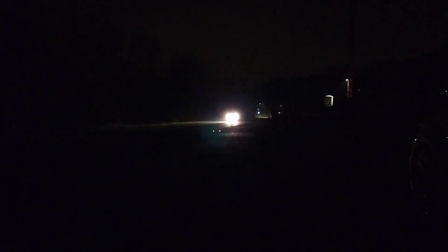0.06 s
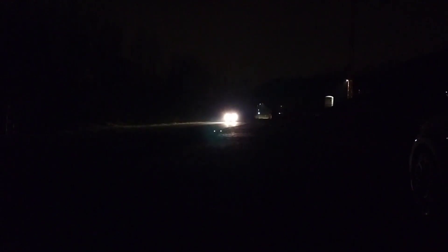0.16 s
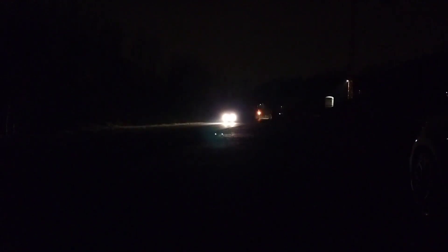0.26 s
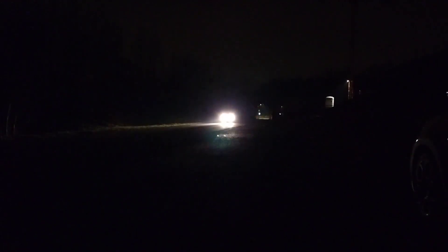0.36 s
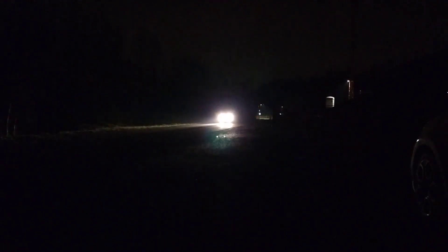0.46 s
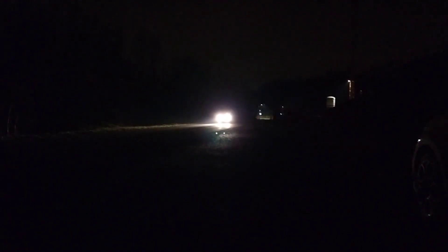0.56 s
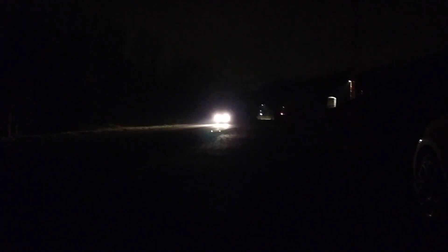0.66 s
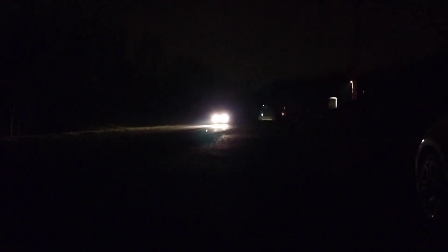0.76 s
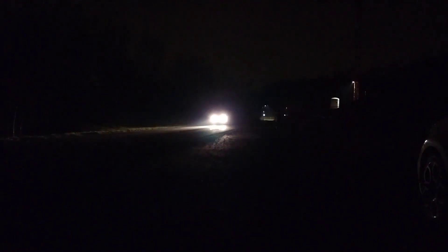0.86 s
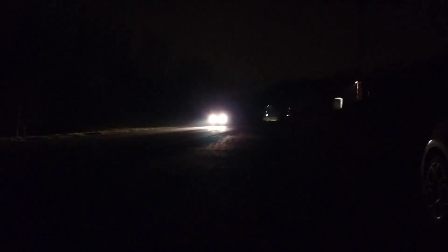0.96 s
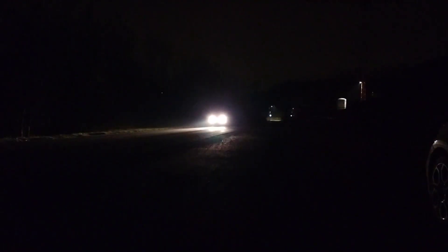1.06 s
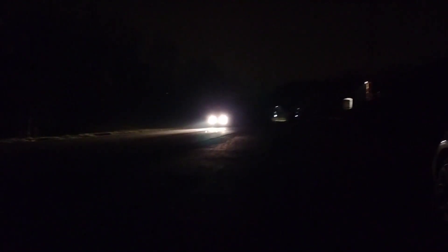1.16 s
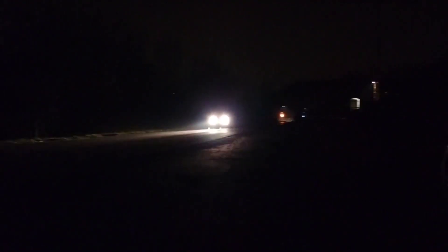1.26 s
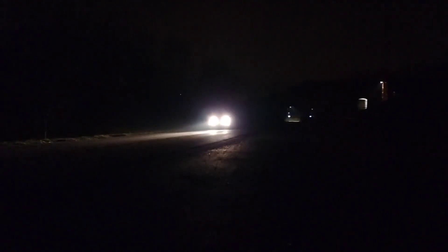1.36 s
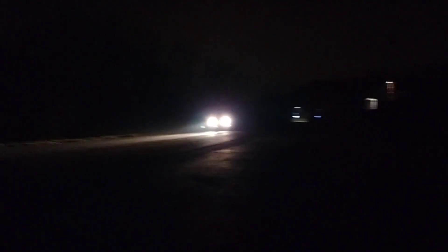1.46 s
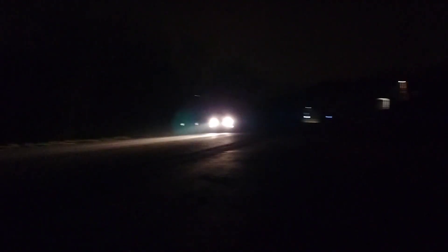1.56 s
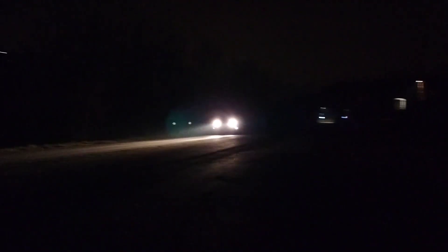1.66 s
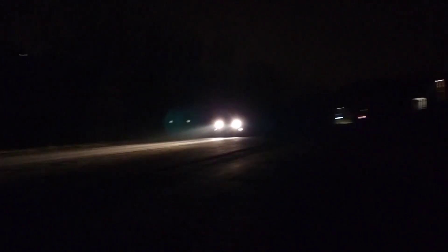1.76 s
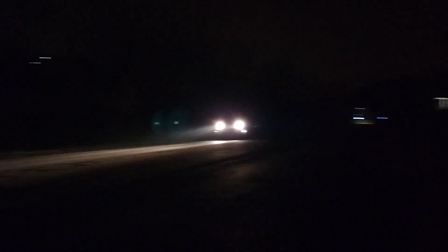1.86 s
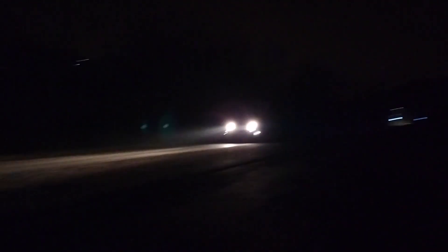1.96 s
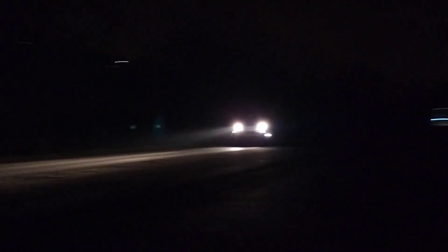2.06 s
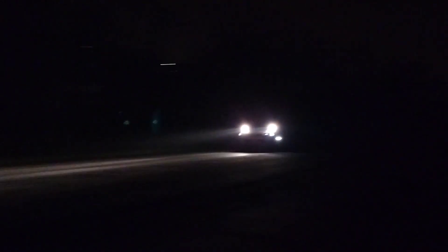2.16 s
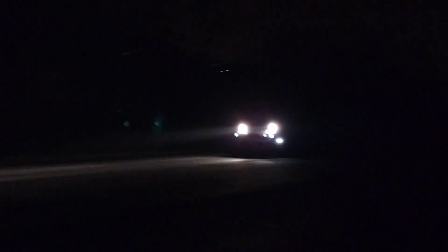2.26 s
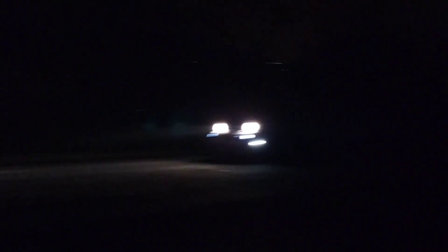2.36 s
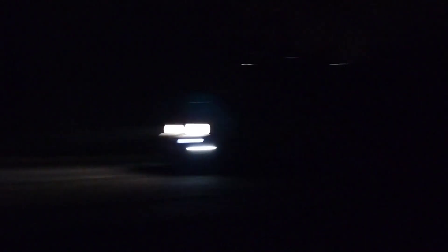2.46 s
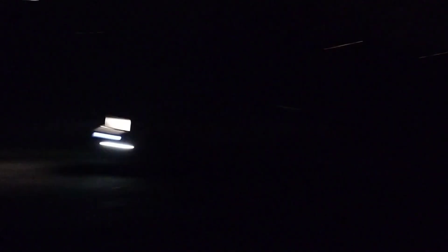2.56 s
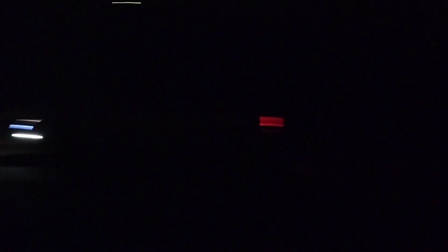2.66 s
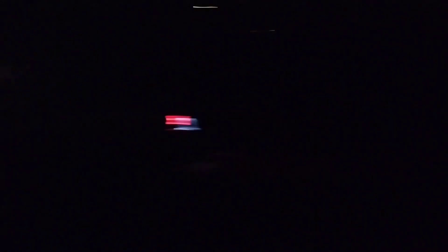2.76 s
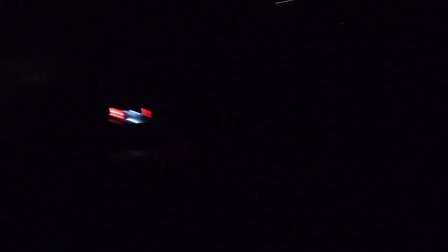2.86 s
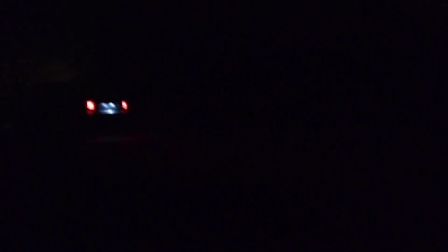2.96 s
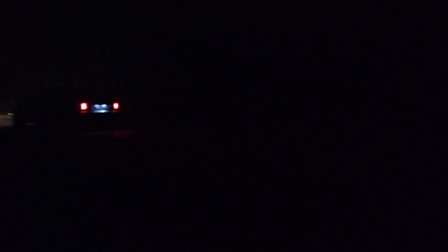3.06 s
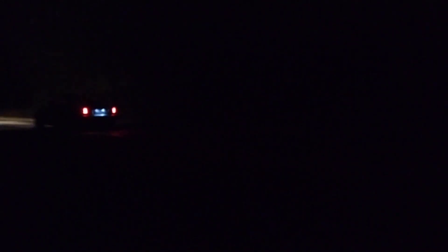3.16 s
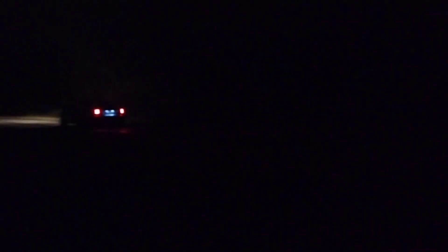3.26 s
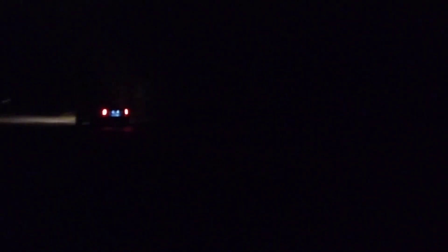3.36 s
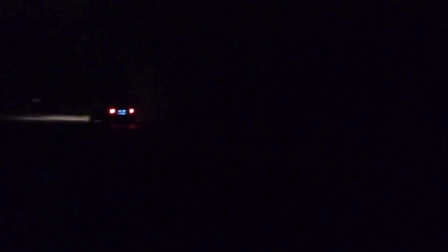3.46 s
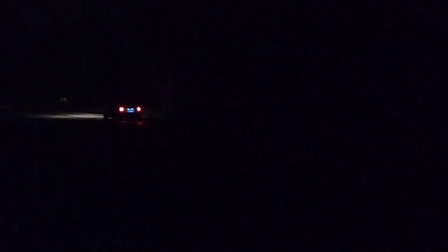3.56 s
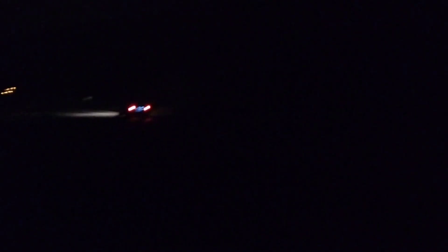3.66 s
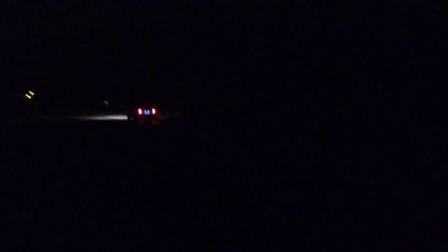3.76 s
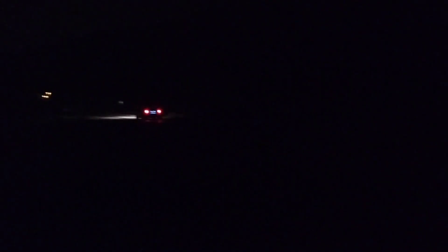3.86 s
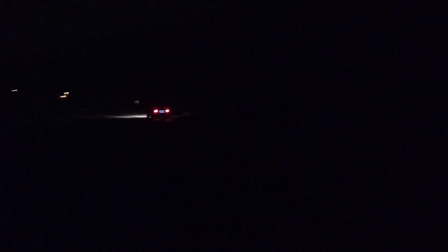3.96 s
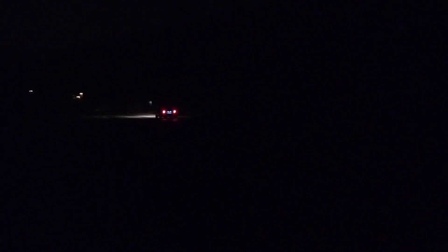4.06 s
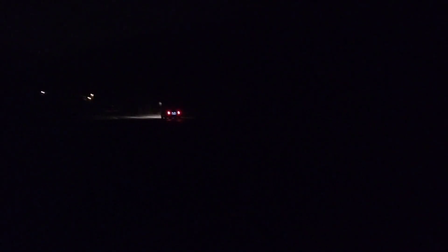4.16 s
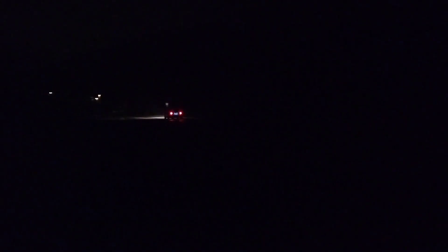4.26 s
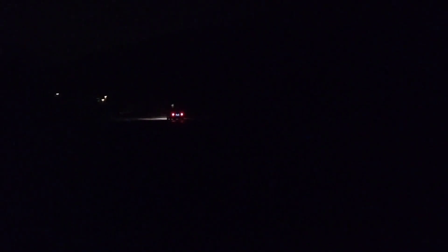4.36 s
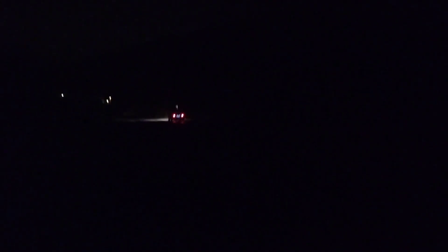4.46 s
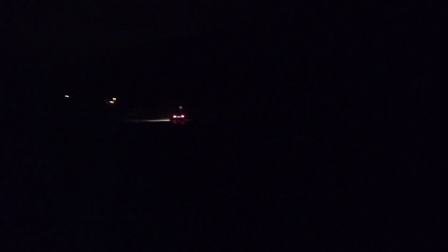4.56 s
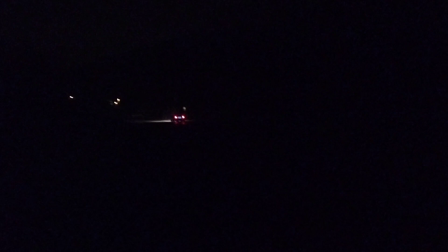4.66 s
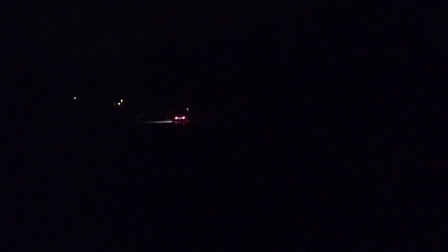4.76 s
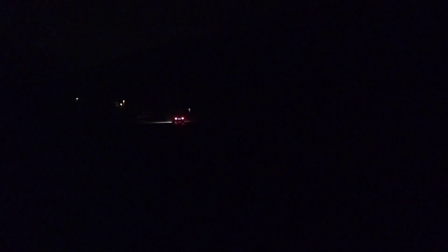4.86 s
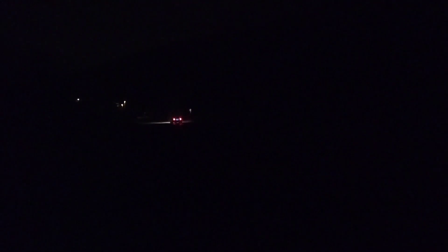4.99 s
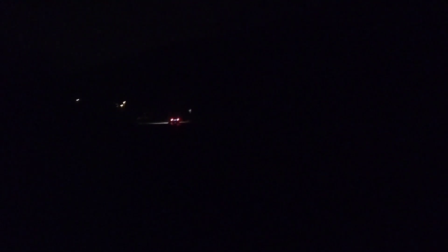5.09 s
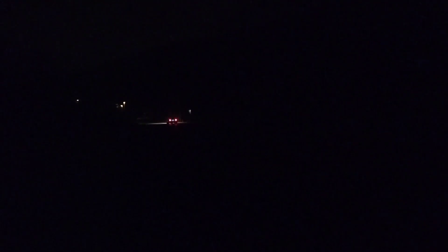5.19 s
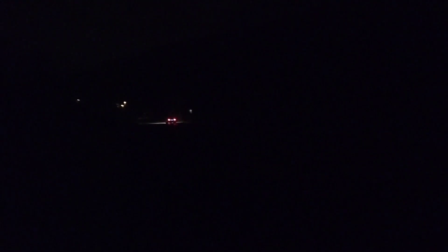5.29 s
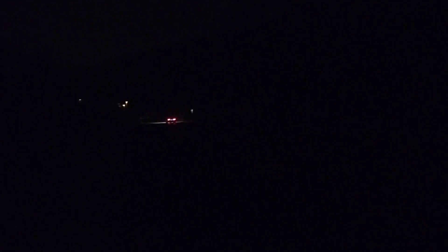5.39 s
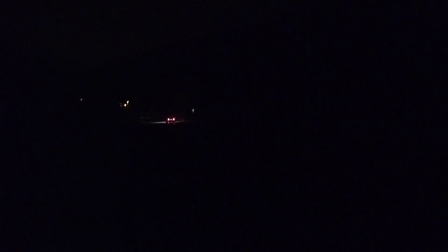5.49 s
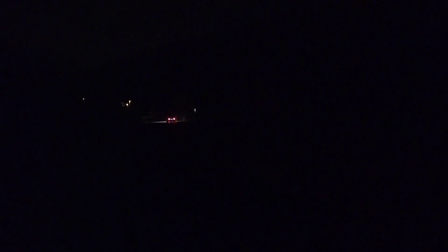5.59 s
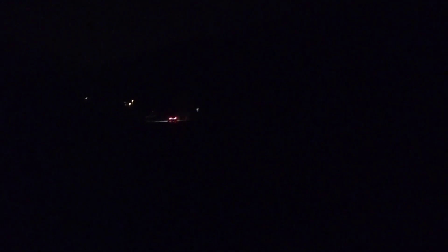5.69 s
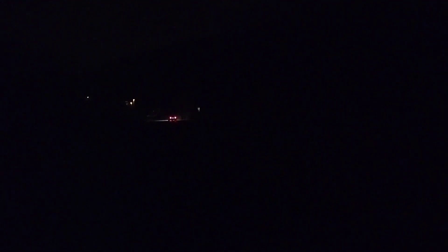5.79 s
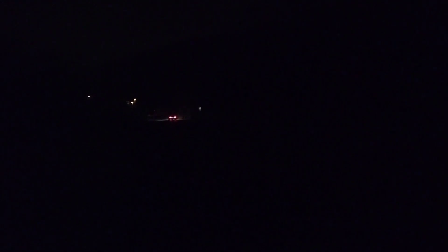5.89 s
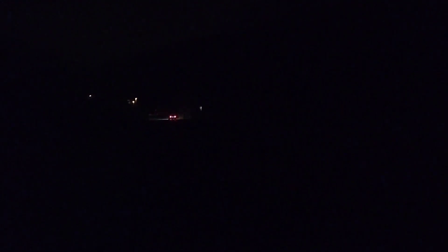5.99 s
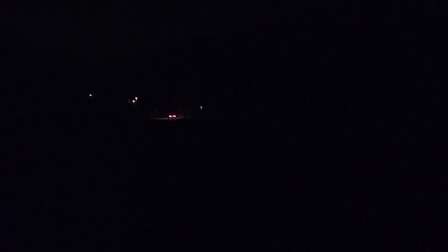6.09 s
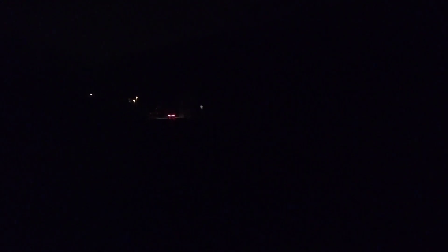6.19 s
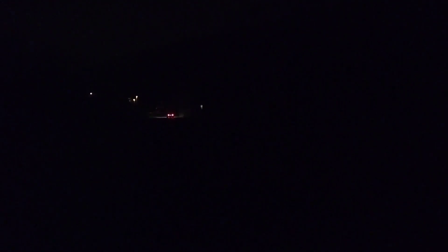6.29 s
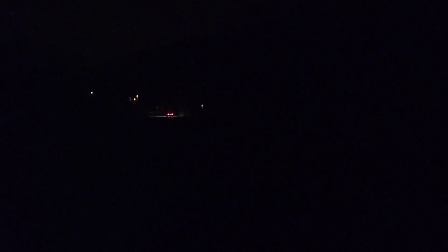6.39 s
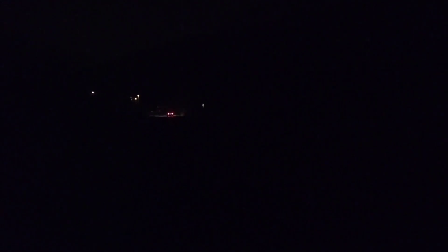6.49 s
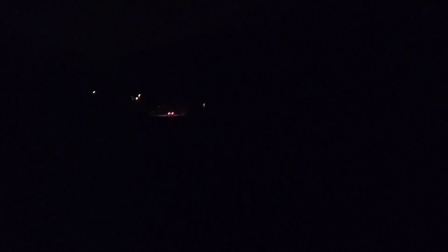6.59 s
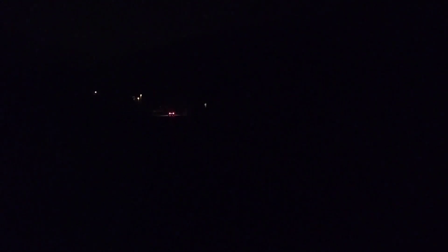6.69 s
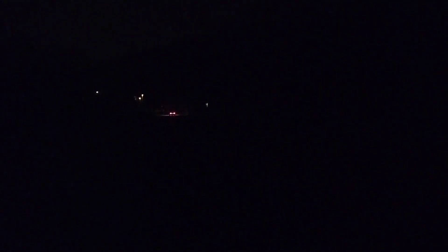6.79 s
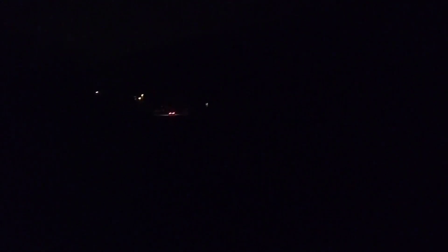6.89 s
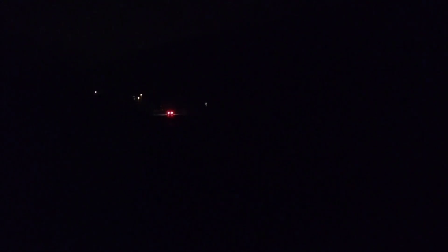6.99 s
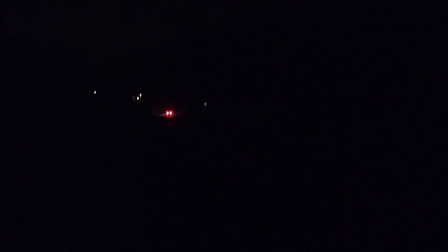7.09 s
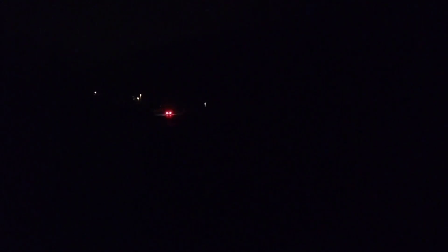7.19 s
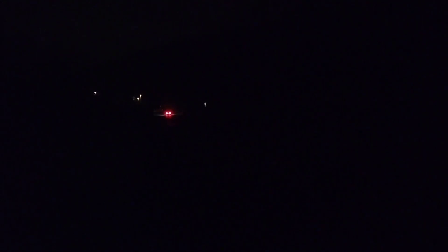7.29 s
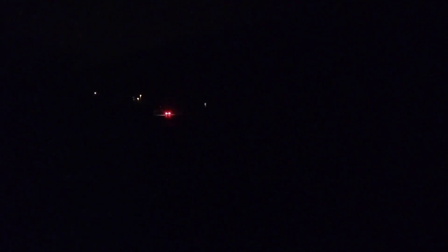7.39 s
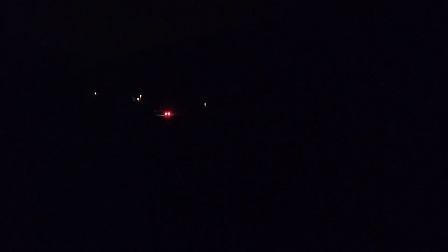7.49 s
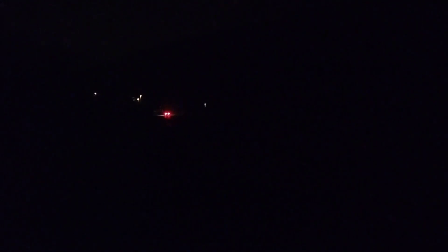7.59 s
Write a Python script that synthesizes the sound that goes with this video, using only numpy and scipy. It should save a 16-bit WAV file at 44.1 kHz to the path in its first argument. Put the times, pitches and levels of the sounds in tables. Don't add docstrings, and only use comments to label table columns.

```python
import sys
import numpy as np
from scipy import signal
from scipy.fft import rfft, irfft, next_fast_len
from scipy.io import wavfile
from scipy.ndimage import map_coordinates

SR = 44100
rng = np.random.default_rng(int(sys.argv[2]) if len(sys.argv) > 2 else 0)


def persist_wave(psi):
    counts = np.round(np.clip(psi, -1, 1) * 32767).astype(np.int16)
    wavfile.write(sys.argv[1], SR, np.atleast_2d(counts).T)


def gain_from_db(level_db):
    decades = np.asarray(level_db, float) / 20
    return 10 ** decades


N = 336924
SECONDS = np.arange(N) / SR
LANE_M = 8.16


def unit(x):
    return x / np.sqrt(np.mean(x ** 2) + 1e-20)


def curves(rows):
    s, *columns = np.transpose(rows)
    return [np.interp(SECONDS, s, column) for column in columns]


def along(points, x):
    at, value = np.transpose(points)
    return np.interp(np.log(x), np.log(at), value)


def by_view(values, turned):
    return np.interp(turned, np.arange(len(values)), values)


def wobble(rate):
    coarse = np.arange(0, N + 64, 64)
    knots = rng.standard_normal(int(N * rate / SR) + 4)
    return np.interp(np.arange(N), coarse, map_coordinates(knots, [coarse * rate / SR]))


def coloured(x, points):
    size = 2 ** 13
    f, db = np.transpose(points)
    log_hz = np.log(np.fft.rfftfreq(size, 1 / SR) + 1)
    gain = gain_from_db(np.interp(log_hz, np.log(f + 1), db, left=-120, right=-120))
    cepstrum = irfft(np.log(gain + 1e-5))
    cepstrum[1:size // 2] *= 2
    cepstrum[size // 2 + 1:] = 0
    response = irfft(np.exp(rfft(cepstrum)))
    return unit(signal.fftconvolve(x, response)[:N])


def rung(x, modes):
    m = next_fast_len(N + SR // 2)
    f = np.fft.rfftfreq(m, 1 / SR)
    gain = 0
    for k, (centre, width, db) in enumerate(modes):
        damping = 1j * f * width
        gain = gain + (-1) ** k * gain_from_db(db) * damping / (centre ** 2 - f ** 2 + damping)
    return irfft(rfft(x, m) * gain, m)[:N]


def soften(x, top_hz):
    return signal.sosfilt(signal.butter(3, top_hz, fs=SR, output="sos"), x)


def pulses(at, size):
    where = np.floor(at).astype(int)[:, None] + np.arange(-7, 9)
    offset = where - at[:, None]
    shape = np.sinc(offset) * np.cos(np.pi * offset / 16) ** 2 * size[:, None]
    return np.bincount(np.clip(where, 0, N).ravel(), shape.ravel(), N + 1)[:N]


def distance():
    since = SECONDS - 2.545
    travelled = 12.5 * since + 1.3 / 2 * np.clip(since, 0, None) ** 2
    return np.hypot(LANE_M, travelled)


# frequency in Hz, level in dB per Hz.
NIGHT_COLOUR = [(20, -26), (60, -13), (120, -11.5), (600, -20.5), (2000, -12), (4000, -23), (5000, -43.5),
                (8000, -61), (15700, -65)]


def night():
    return gain_from_db(-69.0) * coloured(rng.standard_normal(N), NIGHT_COLOUR)


# frequency in Hz, level in dB per Hz.
RUMBLE_COLOUR = [(20, -5), (40, -8.5), (70, -11.5), (110, -10), (200, -10), (320, -8), (500, -6),
                 (600, -3.5), (700, -19.5), (900, -13.5), (980, -57)]
RUMBLE_VIEW_DB = [-6, -13, -10, -2.5]


def rumble(blast_db, turned, throttle, drop_db):
    coasting_hush_db = 2 * (turned > 2.9) * (1 - throttle)
    level_db = by_view(RUMBLE_VIEW_DB, turned) + blast_db - drop_db - coasting_hush_db
    return gain_from_db(level_db + 1.8 * wobble(9.1)) * coloured(rng.standard_normal(N), RUMBLE_COLOUR)


SPREADING = [1.646, 2.05, 2.02]
ABSORPTION = [0.02, 0.25, 0.4]


def spread_db(band, metres):
    spreading = SPREADING[band] * 20 * np.log10(metres / LANE_M)
    return spreading + ABSORPTION[band] * (metres - LANE_M)


def layer(shots, turn, share, spectrum, gate):
    roar = np.gradient(rng.standard_normal(N)) * (1 + gate * np.cos(2 * np.pi * turn - .6))
    roar = roar * gain_from_db(0.53 * wobble(30) + 1.4 * wobble(16))
    share = np.clip(share, 0, 1)
    return np.sqrt(1 - share) * coloured(shots, spectrum) + np.sqrt(share) * coloured(roar, spectrum)


def blend(view, shots, turn, share, spectra, gate):
    mix = 0
    for k, spectrum in enumerate(spectra):
        weight = np.sqrt(np.clip(1 - np.abs(view - k), 0, 1))
        mix = mix + weight * layer(shots, turn, share, spectrum, gate)
    return mix


# frequency in Hz, level in dB per Hz.
AIR_COLOUR = [(7700, -62.5), (8200, 1), (9020, -5), (9630, -9.5), (10800, -14.5), (11600, -8.5),
              (11900, -7.5), (12300, -10), (12900, -18.5), (14800, -16), (15700, -14), (15900, -72)]
AIR_VIEW_DB = [-56.5, -55.5, -57.5, -63]


def air(sharp, turn, share, turned, metres, drop_db, crack_up):
    level_db = by_view(AIR_VIEW_DB, turned) - spread_db(2, metres) - drop_db
    level_db = level_db + 5 * np.exp(-.5 * ((SECONDS - 2.6) / 0.22) ** 2)
    level_db = level_db - 1.2 * np.clip(-85 - level_db, 0, None)
    return gain_from_db(level_db + 0.28 * crack_up) * layer(sharp, turn, share + 0.44, AIR_COLOUR, gate=0.13)


# frequency in Hz, level in dB per Hz.
SIZZLE_NEAR = [(4500, -64), (4800, -1.5), (5640, 3), (6350, -7), (7050, -6), (7370, -6.5), (7830, -18),
               (8300, -26), (8600, -69)]
SIZZLE_FAR = [(4500, -57.5), (4900, -13), (5400, -5.5), (5900, 0.5), (6600, -3), (7200, -5.5), (7700, -23),
              (8600, -71.5)]
SIZZLE_VIEW_DB = [-40, -36.5, -42.5, -45]


def sizzle(sharp, turn, share, turned, metres, drop_db, sizzle_up):
    level_db = by_view(SIZZLE_VIEW_DB, turned) - spread_db(1, metres) - drop_db
    level = np.hypot(gain_from_db(level_db + sizzle_up), gain_from_db(-88))
    far = np.clip(turned - 1, 0, 1)
    return level * blend(far, sharp, turn, share, [SIZZLE_NEAR, SIZZLE_FAR], gate=0.079)


# frequency in Hz, level in dB per Hz.
CRACK_NEAR = [(2200, -45.5), (2550, -9.5), (3050, -1.5), (3500, 3), (3830, 5.5), (4230, 1.5), (4680, -12),
              (5000, -25.5), (5400, -67.5)]
CRACK_FAR = [(1470, -41), (2500, -11.5), (2670, -0.5), (2890, -2.5), (3160, 2), (3640, -2), (4230, -15),
             (5000, -44), (6500, -72), (11000, -120)]
CRACK_VIEW_DB = [-33, -29.5, -29.5, -25.5]


def crack(sharp, turn, share, view, turned, metres, drop_db, crack_up):
    level_db = by_view(CRACK_VIEW_DB, turned) - spread_db(0, metres) - drop_db
    far = np.clip(view / 2 - .5, 0, 1)
    return gain_from_db(level_db + crack_up) * blend(far, sharp, turn, share, [CRACK_NEAR, CRACK_FAR], gate=0.1)


# centre in seconds, crack in dB, sizzle in dB, width in seconds.
VOLLEY_BURSTS = [
    (2.88, 4.5, 4, .025),
    (2.959, 3.5, 9.5, 0.023),
    (3.054, 6, 6, 0.013),
    (3.185, 8.5, 7.5, 0.025),
    (3.29, 6, 1, .016),
    (3.36, 7, 3, 0.02),
    (3.43, 2.5, 4, 0.019),
    (4.26, 6, 4.5, 0.047),
    (7.21, 7.5, 4, 0.065),
]


def volleys():
    s, *db, width = np.transpose(VOLLEY_BURSTS)
    return np.array(db) @ np.exp(-.5 * ((SECONDS - s[:, None]) / width[:, None]) ** 2)


# frequency in Hz, level in dB per Hz.
NOSE_RASP = [(440, -28), (750, 4), (810, -15.5), (837, -8.5), (1040, 4), (1280, -5.5), (1420, -1),
             (1570, -3), (2510, -15), (2800, -20.5), (3640, -35), (6160, -120)]
TAIL_RASP = [(500, -49.5), (700, -20.5), (850, 1), (950, 0.5), (1100, 0), (1300, -7), (1550, -9.5),
             (1930, -21.5), (2200, -20), (2500, -29), (2800, -59.5)]
NEW_GEAR_RASP = [(450, -61.5), (640, -10), (780, -7), (950, 0), (1150, -2.5), (1350, -12), (1600, -9.5),
                 (1850, -17.5), (2150, -15), (2450, -25.5), (2800, -63)]
FAR_RASP = [(450, -60.5), (660, -12.5), (850, -10), (1000, 1.5), (1180, 1.5), (1320, -5.5), (1490, -0.5),
            (1840, -14), (2150, -15), (2400, -35.5), (2800, -57)]


def rasp(steady, turn, share, view, turned, blast_db, drop_db):
    steady = np.where(view < 1.5, steady, soften(steady, 1500))
    swell_db = 1.8 * np.clip(turned - 2, 0, 1) * wobble(9)
    spectra = [NOSE_RASP, TAIL_RASP, NEW_GEAR_RASP, FAR_RASP]
    return gain_from_db(blast_db - drop_db + swell_db) * blend(view, steady, turn, share, spectra, gate=0.092)


# delay in firings, size in dB.
CYLINDER_SPREAD = [(.033, .5), (-.015, -.6), (-.003, .4), (-.015, -.3)]


def firings(turn, uneven, lag, scatter_db):
    n = np.arange(1, int(turn[-1]))
    late, size_db = np.transpose(CYLINDER_SPREAD)[:, n % len(CYLINDER_SPREAD)]
    chance = rng.standard_normal((len(n), 2))
    depth = np.interp(n, turn, uneven)
    at = np.interp(n + lag + depth * late + .003 * chance[:, 0], turn, np.arange(N))
    return pulses(at, gain_from_db(size_db + scatter_db * chance[:, 1]))


# frequency in Hz, level over the drone in dB.
NOSE_RESPONSE = [(170, -0.5), (260, -12.5), (340, -10), (510, -10.5), (680, -5.5), (860, -7.5)]
TAIL_RESPONSE = [(157, 0), (245, -3.5), (315, 2.5), (365, -1), (485, 8), (560, 7), (620, -2.5), (790, -6.5)]
CLOSED_ORDERS_DB = [2, -14, -19, -23.5, -38]
CREEP_ORDERS_DB = [-3, 13, 0.5, -17, 14]
CLOSE_ORDERS_DB = [-2, -6, -9, 6.5, 0.5]
# metres at which each clears the roadside, and the loss in dB before that.
CLEARING_M = [60, 60, 13.9, 20.2, 14.5]
ROADSIDE_LOSS_DB = [0, 0, 6.5, 14, 21]
# loss behind the bonnet in dB, and loss far away in dB per metre.
BONNET_LOSS_DB = [0, 1.5, 6, 12.5, 7]
FAR_LOSS_DB_PER_M = [0.042, 0, 0.0063, 0.068, 0.21]


def orders(hz, drone_db, throttle, turned, metres):
    tail = np.clip(turned, 0, 1) ** 4.2
    creeping = SECONDS < 0.16
    away = metres - LANE_M
    levels = []
    for k, closed_db in enumerate(CLOSED_ORDERS_DB):
        order_hz = (k + 1) * hz
        nose_db = along(NOSE_RESPONSE, order_hz) - BONNET_LOSS_DB[k] * np.exp(-away / 4.9)
        nose_db = nose_db - ROADSIDE_LOSS_DB[k] / (1 + np.exp(CLEARING_M[k] - metres))
        tail_db = along(TAIL_RESPONSE, order_hz) + CLOSE_ORDERS_DB[k] * np.exp(-away / 3)
        tail_db = tail_db - FAR_LOSS_DB_PER_M[k] * np.clip(away - 30, 0, None)
        open_db = np.where(creeping, CREEP_ORDERS_DB[k], tail * tail_db + (1 - tail) * nose_db)
        levels.append(drone_db + (1 - throttle) * closed_db + throttle * open_db)
    return levels


# time in seconds, beats so far, echo share 0-1.
WALL_ECHO = [(.44, 0, 0), (.729, 2, .28), (1.015, 4, .4), (1.21, 6, .25), (1.38, 8, .47), (1.54, 10, .45),
             (1.67, 12, .3), (1.8, 14, .3), (1.94, 16, 0)]


def drone(turn, hz, uneven, orders_db, flip):
    late = np.transpose(CYLINDER_SPREAD)[0]
    slip = np.interp(turn % len(late), np.arange(len(late) + 1), np.append(late, late[0]))
    phase = 2 * np.pi * (turn - .11 - 1.25 * uneven * slip + .003 * wobble(60))
    beats, echo = curves(WALL_ECHO)
    echo_phase = phase - 2 * np.pi * beats
    tone = 0
    for k, db in enumerate(orders_db, 1):
        lag = np.arctan2(k * hz * 130, 540 ** 2 - (k * hz) ** 2) - 1.2 + flip
        wave = np.cos(k * phase - lag) + echo / np.sqrt(k) * np.cos(k * echo_phase - lag)
        tone = tone + gain_from_db(db + 0.46 * wobble(25)) * np.sqrt(2) * wave
    return soften(tone, 3000)


# time in seconds, level in dB.
OVERRUN = [
    (6.98, -101),
    (7.05, -58),
    (7.22, -54),
    (7.27, -43.5),
    (7.64, -44),
]
# frequency in Hz, width in Hz, level in dB.
SILENCER_MODES = [(317, 13, 1), (483, 270, -16.5)]


def overrun(turn):
    second = np.interp(np.arange(1, turn[-1], 2), turn, np.arange(N))
    soft = pulses(second, gain_from_db(1.1 * rng.standard_normal(len(second))))
    soft = soften(soften(soft, 620), 620)
    return gain_from_db(curves(OVERRUN)[0]) * unit(rung(soft, SILENCER_MODES))


# time in seconds, peak in dB.
BACKFIRE_BANGS = [
    (4.0674, -6.5),
    (4.0737, -2.5),
]
# time in seconds, peak in dB.
BURBLE_POPS = [(7.03, -39), (7.05, -42), (7.066, -38), (7.081, -37), (7.09, -36), (7.107, -32),
               (7.129, -30.5), (7.143, -38), (7.16, -36), (7.179, -32), (7.19, -44), (7.204, -33.5)]
# frequency in Hz, width in Hz, level in dB.
PIPE_MODES = [(500, 33, 4), (1060, 210, -1), (146, 250, -1.5)]
GURGLE_MODES = [(301.6, 33.6, 5.5), (252, 54, -20), (464, 68, -21)]


def pops(events, modes, extra_db, top_hz):
    s, db = np.transpose(events)
    return rung(soften(pulses(s * SR, gain_from_db(db + extra_db)), top_hz), modes)


def bangs():
    backfire = pops(BACKFIRE_BANGS, PIPE_MODES, extra_db=31.0, top_hz=2204)
    burble = pops(BURBLE_POPS, GURGLE_MODES, extra_db=44.5, top_hz=450)
    snap = pulses(np.array([BACKFIRE_BANGS[-1][0] * SR]), np.array([gain_from_db(-40)]))
    return backfire + burble + snap


VIEW_GRAIN = [(0, .9, .95, .8), (.5, .42, .9, .6), (.75, .18, .6, .65), (1, .05, .15, .75),
              (2, .1, .75, .5), (3, .36, .87, .47)]


def grain(turned, throttle, metres):
    views, *columns = np.transpose(VIEW_GRAIN)
    low, high, uneven = [np.interp(turned, views, column) for column in columns]
    high = high + 0.046 * (metres - LANE_M) * (turned == 1)
    shut = (1 - throttle) ** 2
    low = low + shut * (.97 - low)
    high = high + shut * (.97 - high)
    return low, high, uneven


# time in seconds, rate in Hz.
FIRING_RATE = [(0, 121.2), (.19, 119.1), (.26, 127.8), (.38, 152.8), (.47, 169.7), (.6, 159), (1.29, 165.3),
               (2.2, 173.3), (2.64, 171.9), (2.81, 162.5), (3.03, 157.7), (3.93, 157), (4.06, 150.4),
               (4.45, 118), (4.53, 120), (6.84, 124.6), (7.05, 122.6), (7.64, 122)]
# time in seconds, opening 0-1.
THROTTLE_OPENING = [(0, 0.45), (.12, 0.58), (.17, 0.22), (.23, 0.17), (.27, 0.4), (.33, 0.4), (.38, 0.36),
                    (.42, 0.43), (.52, 0.86), (3.8, 0.95), (3.825, 0.04), (3.95, 0.03), (4.062, 0.24),
                    (4.07, 0.89), (6.84, 1), (6.91, 0.76), (6.96, 0.14), (7.64, 0.05)]
# time in seconds, view (0 nose, 1 tail, 2 new gear, 3 far).
SIDE_HEARD = [
    (0, 0),
    (2.2, .1),
    (2.9, 1),
    (3.81, 1),
    (3.83, .3),
    (4.064, .3),
    (4.068, 2),
    (4.9, 2),
    (5.4, 3),
]
# time in seconds, level in dB.
BLAST_LEVEL = [(0, -42), (.13, -43.5), (.2, -39), (.5, -36.5), (1.5, -29.5), (2, -21), (2.31, -17),
               (2.42, -19), (2.72, -24), (2.95, -20.5), (3.8, -21.5), (4.26, -22), (4.72, -25.5),
               (5.15, -31.5), (5.72, -34.5), (5.85, -37.5), (6.8, -43), (7.64, -52.5)]
# time in seconds, level in dB.
DRONE_LEVEL = [(0, -38.5), (.17, -47), (.23, -38), (.27, -27.5), (.35, -29), (.385, -40), (.42, -25.5),
               (1.29, -24), (2.15, -19), (2.47, -16), (2.81, -20), (3.03, -29), (3.8, -25), (3.93, -27.5),
               (4.04, -24.5), (4.45, -23.5), (6.87, -28.5), (6.96, -45)]
# time in seconds, push 0-1.
TAIL_PUSH = [(2.35, 0), (2.47, 1), (3.81, 1), (3.87, 0)]
CLOSED_DROP_DB = [16.5, 10.4, 9, 4.5, 2.3]


def car():
    hz, drone_db, blast_db, view = [curves(t)[0] for t in (FIRING_RATE, DRONE_LEVEL, BLAST_LEVEL, SIDE_HEARD)]
    turn = np.cumsum(hz) / SR
    throttle = np.clip(curves(THROTTLE_OPENING)[0], 0, 1)
    turned = np.maximum.accumulate(view)
    metres = distance()
    flip = np.pi * curves(TAIL_PUSH)[0]
    low_share, high_share, uneven = grain(turned, throttle, metres)
    rasp_drop, crack_drop, sizzle_drop, air_drop, rumble_drop = np.outer(CLOSED_DROP_DB, 1 - throttle)
    crack_up, sizzle_up = volleys()
    steady = firings(turn, uneven, lag=0, scatter_db=.8) * np.cos(flip)
    sharp = firings(turn, uneven, lag=.06, scatter_db=2.5) * np.cos(flip)

    out = rumble(blast_db, turned, throttle, rumble_drop)
    out += air(sharp, turn, high_share, turned, metres, air_drop, crack_up)
    out += sizzle(sharp, turn, high_share, turned, metres, sizzle_drop, sizzle_up)
    out += crack(sharp, turn, high_share, view, turned, metres, crack_drop, crack_up)
    out += rasp(steady, turn, low_share, view, turned, blast_db, rasp_drop)
    out += drone(turn, hz, uneven, orders(hz, drone_db, throttle, turned, metres), flip)
    return out + overrun(turn)


def scene():
    return (night() + car() + bangs())[None]


def low_pass(x):
    return signal.sosfilt(signal.butter(12, 16480, fs=SR, output="sos"), x)


def record(dry):
    thin = signal.sosfilt(signal.butter(3, 98, "high", fs=SR, output="sos"), dry)
    held = thin / (1 + np.abs(thin / .8) ** 8) ** (1 / 8)
    return low_pass(held)


dry = scene()
out = record(dry)
persist_wave(out)
```